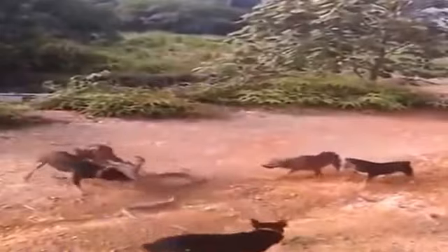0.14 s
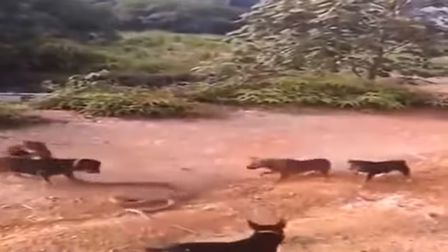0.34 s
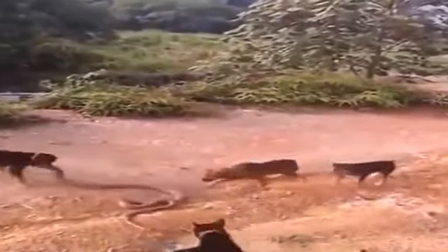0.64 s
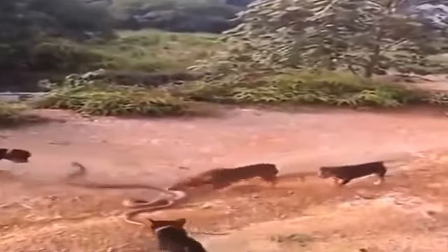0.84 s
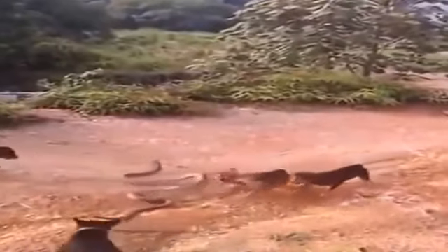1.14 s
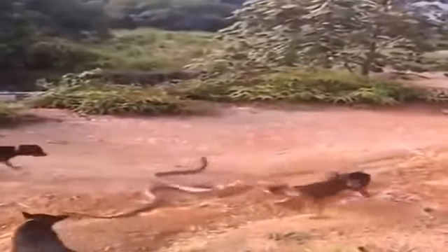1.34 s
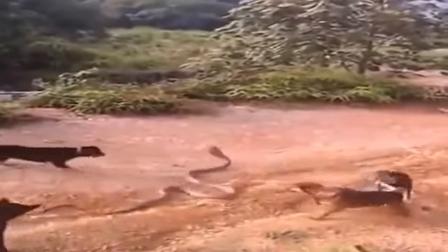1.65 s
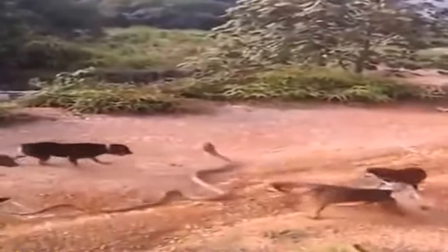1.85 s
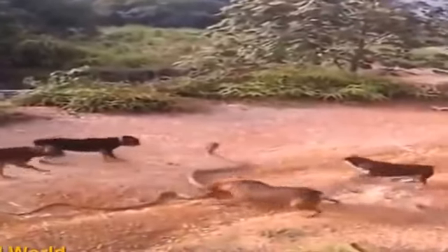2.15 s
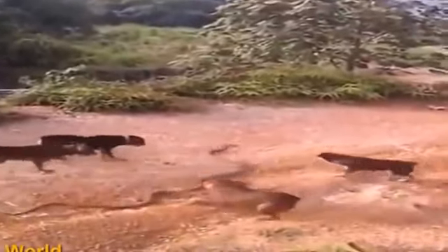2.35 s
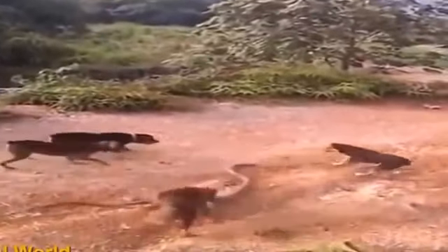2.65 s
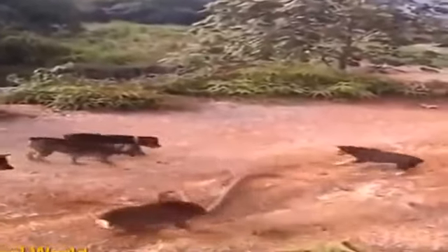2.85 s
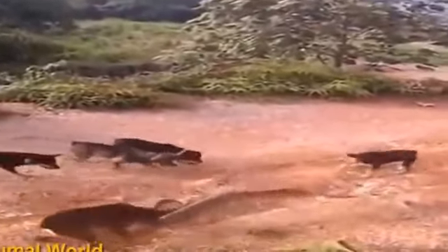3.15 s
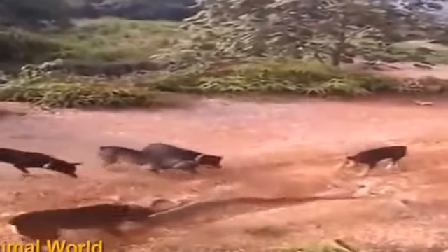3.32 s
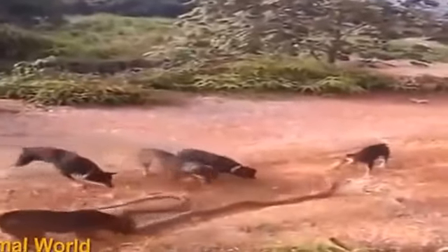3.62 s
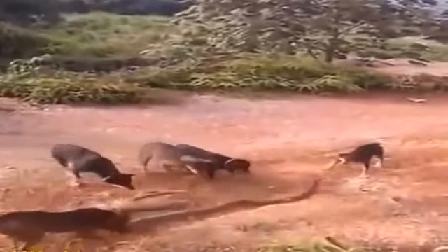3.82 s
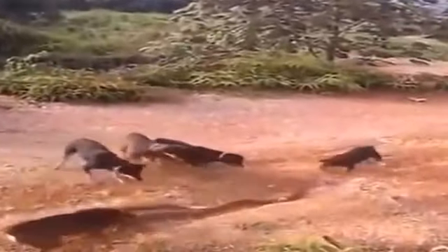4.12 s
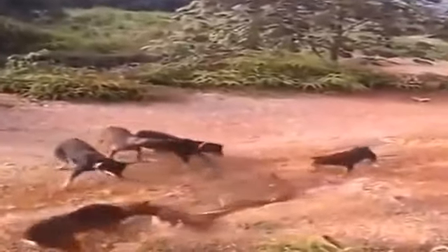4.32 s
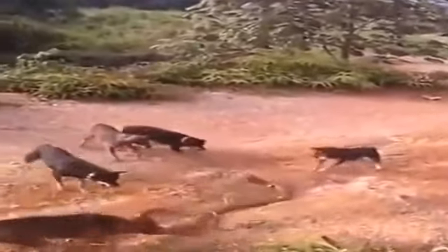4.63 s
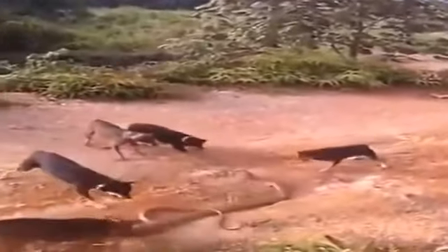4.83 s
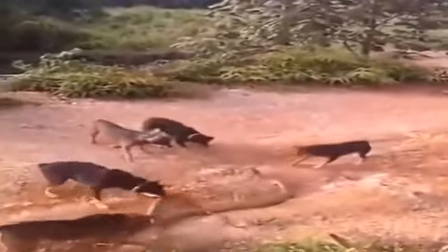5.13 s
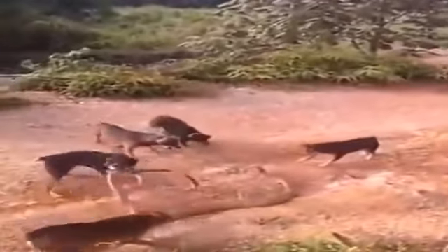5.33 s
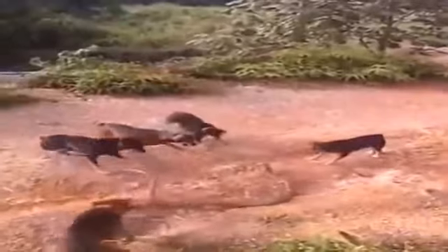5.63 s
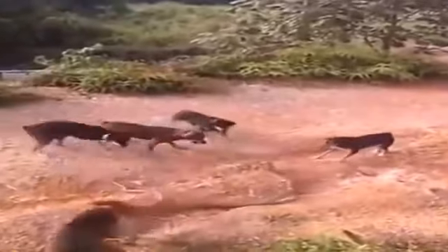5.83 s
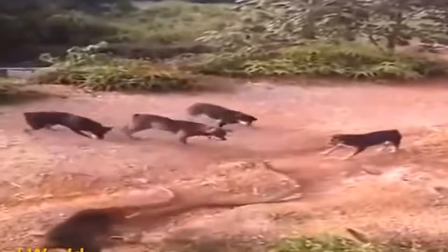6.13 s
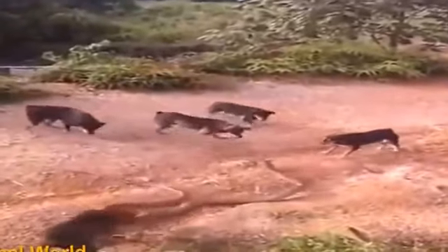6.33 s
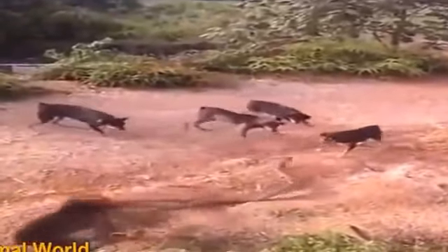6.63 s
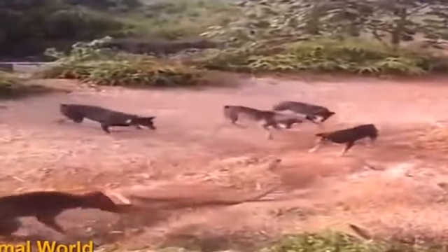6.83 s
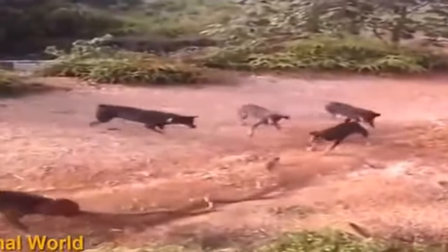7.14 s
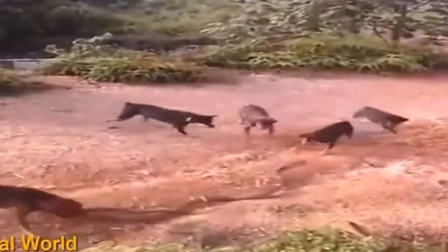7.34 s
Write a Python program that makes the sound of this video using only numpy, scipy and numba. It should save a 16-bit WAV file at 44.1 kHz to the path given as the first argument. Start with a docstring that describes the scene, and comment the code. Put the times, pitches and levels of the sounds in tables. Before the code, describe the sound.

A pack of dogs confronts a snake in an open dirt yard. It opens with a soft, rough bark and brief snarls, then one short, spitting hiss at about 0.4 seconds. Hard barking starts at 1.1 seconds, with a snarl and a very loud bark at 1.5. From 2.1 seconds to about 7.2 the barks come quickly and unevenly, roughly three a second, densest between 4.2 and 6. Each is short, fairly high and raspy, bending in pitch and sometimes cracking like a yelp. Quieter growls fill some gaps, with stronger snarls near 6.8, just before another very loud bark at 7. Small birds chip faintly during the first 2.6 seconds and once more clearly near 6.8. Soft outdoor air and faint gritty paw scuffs continue throughout. Bushes add a thin, short echo, and the phone microphone slightly flattens the loudest barks.

```python
"""Dogs bark hard, growling and snarling in between, as the pack mobs a snake on a dirt yard.
Each bark is a buzz of the vocal folds that bends in pitch and flips between clean and rough,
shaped by throat and mouth. Bushes scatter a short echo, paws scuff the ground, small birds chip,
and there is one sharp hiss. A phone's limiter flattens the loudest barks."""
import sys
import numpy as np
from scipy import signal
from scipy.fft import rfft, irfft
from scipy.io import wavfile
from scipy.ndimage import uniform_filter1d
from numba import njit

SR = 44100
rng = np.random.default_rng(int(sys.argv[2]) if len(sys.argv) > 2 else 0)


def dump_mix(stems):
    """Bounce the given channels to the path in sys.argv[1] as a 16-bit WAV at rate SR."""
    frames = np.atleast_2d(stems).T  # one column per channel
    limited = np.clip(frames, -1, 1)  # hard clip at full scale
    pcm = np.round(limited * 32767).astype(np.int16)
    wavfile.write(sys.argv[1], SR, pcm)


N = 329427
TIME = np.arange(N) / SR


def undb(db):
    """Turn decibels into a gain."""
    return 10 ** (np.asarray(db) / 20)


def unit(x):
    """Scale to an average level (rms) of 1."""
    return x / np.sqrt(np.mean(x ** 2))


def blend(a, b, share):
    """Go from a to b as the share goes from 0 to 1."""
    return a + (b - a) * share


def steady(x, span_s):
    """Even out the level over a short span."""
    return x / np.sqrt(np.abs(uniform_filter1d(x ** 2, max(int(span_s * SR), 2))) + 1e-9)


def wander(rate_hz):
    """A smooth random wobble, about 1 in size."""
    return unit(signal.sosfilt(signal.butter(2, rate_hz, fs=SR, output="sos"), rng.standard_normal(N)))


def swell(start_s, length_s, edge_s=0.035):
    """Fade in, hold, fade out."""
    return np.clip(np.minimum(TIME - start_s, start_s + length_s - TIME) / edge_s + 0.53, 0, 1)


def colour(x, points):
    """Shape a sound's tone with (frequency_hz, gain_db) points; its level comes out as 1."""
    hz, db = np.transpose(points)
    bins = np.maximum(np.fft.rfftfreq(N, 1 / SR), 1)
    return unit(irfft(rfft(x) * undb(np.interp(np.log(bins), np.log(hz), db)), N))


@njit
def band_pass(x, hz, width_hz):
    """Keep only the sound near a moving frequency."""
    out, band, low = np.empty(len(x)), 0., 0.
    for i in range(len(x)):
        tuning, damping = np.tan(np.pi * hz[i] / SR), width_hz / hz[i]
        now = (band + tuning * (x[i] - low)) / (1 + tuning * (tuning + damping))
        band, low, out[i] = 2 * now - band, low + 2 * tuning * now, damping * now
    return out


def resonance(x, hz, width_hz):
    """Ring like a hollow space: the band-pass applied twice."""
    centre = np.clip(hz + np.zeros(N), 50, SR / 3)
    return band_pass(band_pass(x, centre, float(width_hz)), centre, float(width_hz))


# Strength of the voice's harmonics (multiples of its pitch), lowest first: level_db
HARMONICS = [3.5, 5.5, 6, -3, -6.5]


def vocal_folds(hz, rough):
    """The folds pulse and let out a puff of air each cycle; roughness (0 to 1) makes them uneven."""
    shaky_hz = hz * (1 + .075 * rough * wander(220.2) + .027 * np.sqrt(rough) * wander(73.65))
    phase = 2 * np.pi * np.cumsum(shaky_hz) / SR
    pulses = unit(sum(undb(db) * np.cos(k * phase) for k, db in enumerate(HARMONICS, 1)))
    # in fits, strong and weak cycles take turns, adding tones between the harmonics
    pulses *= 1 + 1.1 * rough * wander(21.7) * np.cos(phase / 2)
    puffs = rng.standard_normal(N) * (1 + 1.5 * np.cos(phase))
    return pulses * (1 + .7 * rough * wander(121)) + 1.55 * rough * (1 + 2 * rough ** 2) * puffs


def bark_level(start_s, end_s, start_db, end_db):
    """One bark's level in dB: a soft lead-in, a burst, a sloping hold, a fade as the jaw closes."""
    times = [start_s - .034, start_s - .011, start_s + .0042, end_s - .002, end_s + .011, end_s + .05]
    levels = [-48, min(-20, start_db), start_db, end_db, -22, -48]
    return np.interp(TIME, times, levels, left=-120, right=-120)


# The barks. Pitch arches to a crest (a negative arch dips); roughness runs from 0 to 1;
# open_db and closing_db are the mouth's share of the sound as the jaw moves.
# start_s, end_s, start_db, end_db, crest_hz, crest_delay_s, arch_octaves,
# crest_rough, side_rough, open_db, closing_db, mouth_hz
BARKS = [(.003, 0.076, -19, -20.5, 498.4, 0.062, 0.37, 1, 0.68, -7, -2.5, 2400),
         (1.073, 1.18, -3.5, -17, 389, 0.084, -0.24, 0.29, 0.65, -1.5, -5.5, 2350),
         (1.502, 1.615, 2, -10, 600, 0.1, 0.34, 0.047, 0.87, -1, -5.5, 2280),
         (2.132, 2.175, -9, -9, 509.8, 0.019, 0.11, 0.538, 0.65, -2.5, -3.5, 2493),
         (2.191, 2.23, -9.5, -15, 529.4, .015, 0.14, 0.48, 0.69, -8.5, -13, 2280),
         (2.636, 2.736, -3.5, -11.5, 678.2, 0.06, .5, .13, .75, -5, -10, 2250),
         (2.837, 2.957, -6, -10.5, 691.7, .02, 0.13, 0.59, 0.45, -2.5, -7, 2440),
         (3.123, 3.235, -6, -11.5, 610.5, .06, .33, .42, 0.62, -8.5, -7, 2440),
         (3.531, 3.645, -5, -11, 695.4, 0.073, 0.58, .18, 0.52, -7.5, -13.5, 2170),
         (3.722, 3.834, -4.5, -7.5, 686.7, 0.032, .4, 0.64, 0.79, -0.8, -0.3, 2346),
         (4.234, 4.334, -2, -14, 360, 0.0595, -.1, 0.35, .65, -1, -0.4, 2360),
         (4.392, 4.502, -8, -9.5, 589, 0.076, -0.19, 0.38, 0.68, -1.5, -12, 2294),
         (4.566, 4.734, -9, -8.5, 622, .12, 0.052, 0.63, 0.711, -5.5, -10, 2330),
         (4.85, 4.961, -5.5, -12.5, 602.7, .02, .05, 0.494, 0.48, -6, -3, 2017),
         (5.23, 5.323, -0.5, -12.5, 676, .06, .12, .08, 0.7275, -1.5, -10, 2120),
         (5.526, 5.638, -3, -12, 671.8, 0.0029, 0.15, 0.72, 0.82, -0.5, -1, 2334),
         (5.805, 5.935, -8, -11, 615.4, 0.081, 0.069, 0.27, 0.68, -6, -17, 2100),
         (6.315, 6.416, -2, -10.5, 637.3, 0.021, .35, 0.37, .6, -6.5, -6, 2650),
         (6.459, 6.559, -13.5, -10.5, 527.2, 0.067, 0.15, .2, 0.99, -4.5, -19, 2148),
         (6.945, 7.055, 3, -13, 646.7, 0.023, 0.24, 0.56, 0.86, -0.5, -3.5, 2530),
         (7.092, 7.206, -10, -7.5, 615, 0.074, 0.39, 0.3, 0.56, -4.5, -8.5, 2021)]
# Voice breaks, where the pitch jumps for the rest of the bark: time_s, pitch_ratio
VOICE_BREAKS = [(1.611, 0.71), (2.705, 0.83), (2.892, 0.92), (3.598, 0.76), (4.478, 1.05), (4.655, .91),
                (4.9, .92), (5.293, 0.75), (5.57, .87), (5.832, 0.84)]
# Moments when the mouth rings on the third harmonic: start_s, length_s
MOUTH_RINGS = [(2.859, 0.03), (3.757, 0.021), (4.456, .018), (4.671, 0.0497), (4.881, 0.0446),
               (5.24, 0.047), (5.573, 0.042), (6.982, .012)]


def bark_motion(arch_s=.08, crest_rough_s=.041, break_s=.0057):
    """How the voice moves: pitch and roughness bend, the jaw closes, the voice may break or ring."""
    levels = np.array([bark_level(*bark[:4]) for bark in BARKS])
    loudest = np.transpose(BARKS)[:, levels.argmax(axis=0)]  # one bark sounds at a time
    start_s, end_s, _, _, crest_hz, crest_delay_s, arch_octaves = loudest[:7]
    crest_rough, side_rough, open_db, closing_db, mouth_hz = loudest[7:]
    from_crest = TIME - start_s - crest_delay_s
    hz = crest_hz * 2 ** (arch_octaves * (np.exp(-(from_crest / arch_s) ** 2) - 1))
    rough = blend(side_rough, crest_rough, np.exp(-(from_crest / crest_rough_s) ** 2))
    jaw_closed = np.interp((TIME - start_s) / (end_s - start_s), (.35, .7), [0, 1])
    mouth_db = blend(open_db, closing_db, jaw_closed)
    mouth_hz = mouth_hz * (1 - .072 * jaw_closed)
    for time_s, pitch_ratio in VOICE_BREAKS:
        broken = np.clip((TIME - time_s) / break_s + .5, 0, 1) * (start_s < time_s) * (time_s < end_s)
        hz = hz * blend(1, pitch_ratio, broken)
        # after the jump, the folds run fairly evenly for a moment
        rough = blend(rough, .34, broken * swell(time_s, .0438, edge_s=break_s))
    ring = sum(swell(start, length, edge_s=.0156) for start, length in MOUTH_RINGS)
    rough = blend(rough, .14, ring)
    mouth_db = blend(mouth_db, -.24, ring)
    mouth_hz = blend(mouth_hz, 3 * hz, ring)
    return levels.max(axis=0), hz, rough, mouth_db, mouth_hz


# Tone of the lips, the breathy rasp and the folds' buzz: frequency_hz, gain_db
LIP_TONE = [(1000, 9), (2900, 9.5), (3500, -89)]
RASP_TONE = [(100, -23.5), (450, 11.5), (3000, 11), (3800, -13.5), (5200, 9.5), (8500, 1.5), (9200, -11.5),
             (15000, -13.5)]
BUZZ_TONE = [(2700, -60), (3150, 8.5), (6000, 5), (9000, -8)]


def barks(usual_hz=587):
    """The folds make the throat ring at twice their pitch, and the mouth ring as the jaw opens."""
    level_db, hz, rough, mouth_db, mouth_hz = bark_motion()
    # with little breath behind it, the voice sags, roughens and leans on its lowest tone
    slack = np.clip((-17 - level_db) / 12, 0, 1)
    catches = 1 + .01402 * np.tanh(3 * wander(23.84))  # small random steps of pitch
    hz = hz * (1 - .17 * slack) * catches
    voice = vocal_folds(hz, np.clip(np.maximum(rough, .595 * slack), .02, 1))
    opening = np.clip(undb(mouth_db), .05, .98)
    flutter = undb(2 * wander(86))  # tips the balance between throat and mouth
    throat = steady(resonance(voice, 2 * hz, 425), .0063) * np.sqrt(1 - opening ** 2) * flutter
    mouth = steady(resonance(colour(voice, LIP_TONE), mouth_hz, 696.3), .012) * opening / flutter
    chest_db = -25.5 + 21.3 * slack + 4 * (1 - rough)
    chest = steady(resonance(voice, np.maximum(hz, 450), 335), .11) * undb(chest_db)
    # air tears past the teeth; each high, narrow band drifts and flares on its own
    air = rng.standard_normal(N) * undb(.29 * wander(150))
    teeth = unit(sum(resonance(air, band_hz * (1 + .04 * wander(8)), 330) * undb(5 * wander(22))
                     for band_hz in (3100, 4500, 4950, 5400, 6000)))
    octaves_down = np.log2(usual_hz / hz)
    rasp_db = -13.5 + .5 * rough + octaves_down * (3 - slack) + 1.075 * wander(15)
    rasp = (colour(air, RASP_TONE) + undb(-5) * teeth) * undb(rasp_db)
    # the folds slam shut, adding a bright buzz
    buzz = colour(np.tanh(2 * (throat + mouth) + .7), BUZZ_TONE) * undb(-19)
    tremble_db = (1.63 + 1.6 * slack) * wander(59)
    return (throat + mouth + chest + rasp + buzz) * undb(level_db + tremble_db)


def bush_echo(x, level_db, fade_s=.7):
    """Leaves and ground scatter a thin, patchy echo."""
    patches = rng.standard_normal(N) * undb(2 * wander(130))
    bounces = patches * np.clip(TIME / .089, 0, 1) * undb(-60 * TIME / fade_s)
    tone = [(200, 13), (1100, .5), (1800, -5), (5000, 12.5), (10000, -17.5)]
    echo = colour(bounces, tone)[:SR] / np.sqrt(N)
    return undb(level_db) * signal.fftconvolve(x, echo)[:N]


# Tone of the outdoor air, and of the noise in scuffs, snarls and the hiss: frequency_hz, gain_db
AIR_TONE = [(35, -72), (60, -53.5), (214, -7.5), (727, -4.5), (982, -6), (1750, -4.5), (2420, -5),
            (3050, -12.5), (3340, -7), (4110, -8), (4510, -3), (9450, -26), (13700, -28), (15000, -26)]
HISS_TONE = [(300, -34), (1150, 3.5), (1600, -31), (2400, 7.5), (3100, -12), (4700, 4.5), (6000, 1.5),
             (9500, -31.5), (14000, -27)]


def air_and_paws():
    """Outdoor air swells and dips while paws scuff the gritty dirt."""
    air = colour(rng.standard_normal(N), AIR_TONE) * undb(-37.5 + 2.2 * wander(4))
    grit = rng.standard_normal(N) * undb(3.4 * wander(369.5))
    scuffs = colour(grit, HISS_TONE) * undb(-40 + 3.6 * wander(30))
    return air + scuffs


# Growls and whines: start_s, length_s, pitch_hz, voice_db, snarl_db
GROWLS = [(0.015, 0.061, 509.3, -21.5, -22.5), (0.091, 0.1, 395.4, -45, -30.5),
          (.435, 0.047, 567.6, -40, -22.5), (0.62, 0.084, 625.7, -33.5, -34.5),
          (1.2, 0.16, 462.2, -35, -28), (1.265, 0.042, 473.5, -42, -21.5),
          (1.355, 0.057, 509.6, -32, -15.5), (2.14, 0.085, 703, -23, -50), (3.034, 0.13, 413, -26.5, -43),
          (4.011, 0.071, 400, -33.5, -39), (4.536, 0.053, 550.6, -26, -38), (4.736, 0.049, 451, -30.5, -34),
          (4.82, 0.036, 484, -20.5, -27), (5.631, 0.034, 510, -23, -26), (6.624, 0.17, 387, -35.5, -34.5),
          (6.776, 0.044, 472.2, -21, -16), (6.828, 0.064, 566, -40, -16)]


def growls(rattle_hz=54):
    """A low wavering tone, and uneven flaps of the throat that chop its overtone in the muzzle."""
    starts, _, pitches, _, _ = np.transpose(GROWLS)
    current = np.maximum(np.searchsorted(starts - .008, TIME) - 1, 0)
    hz = pitches[current] * (1 + .03 * wander(14.9))
    pulses = vocal_folds(hz, rough=.65)
    voice = unit(resonance(pulses, hz, 218))
    flaps = 1 + .6 * np.tanh(1.2 * wander(85))
    breath = undb(-10.5) * colour(rng.standard_normal(N), HISS_TONE)
    muzzle = steady(resonance(pulses, 1056, 370), .0102) + breath
    rattle = np.cos(2 * np.pi * np.cumsum(rattle_hz * (1 + .202 * wander(18.2))) / SR)
    snarl = unit(muzzle * flaps * undb(.5 * rattle))
    return sum(swell(start_s, length_s) * (undb(voice_db) * voice + undb(snarl_db) * snarl)
               for start_s, length_s, _, voice_db, snarl_db in GROWLS)


# Short bird calls: middle_s, pitch_hz, level_db
BIRD_CHIPS = [(.19, 3770, -34), (.23, 4440, -33), (0.802, 3880, -35), (.831, 4606, -36), (1.82, 4570, -47),
              (1.861, 4800, -29.5), (2.009, 4530, -31.5), (2.325, 3797, -31), (2.434, 4470, -32.5),
              (2.489, 5463, -31), (2.565, 3759, -34.5), (6.779, 5035, -21)]


def birds(fade_s=.011):
    """Faint, quavering chips, blurred by the bushes."""
    quaver_time = np.cumsum(1 + .0058 * wander(180)) / SR
    chips = np.zeros(N)
    for middle_s, pitch_hz, level_db in BIRD_CHIPS:
        blip = np.exp(-((TIME - middle_s) / fade_s) ** 2)
        chips += undb(level_db) * blip * np.sin(2 * np.pi * pitch_hz * quaver_time)
    return chips + bush_echo(chips, level_db=-26)


def hiss(start_s=.391, length_s=.096, level_db=-18):
    """One sharp, spitting hiss: a short burst of bright noise."""
    spit = rng.standard_normal(N) * undb(.46 * wander(74))
    return colour(spit, HISS_TONE) * swell(start_s, length_s) * undb(level_db)


def scene():
    """The pack, its echo, the yard and the birds, in one channel."""
    pack = barks() + growls() + hiss()
    return (pack + bush_echo(pack, level_db=-21) + air_and_paws() + birds())[None]


@njit
def follow_peaks(x, rise_s, fall_s):
    """Track how loud a sound is, rising quickly and falling more slowly."""
    rise, fall = 1 / (1 + rise_s * SR), 1 / (1 + fall_s * SR)
    out, level = np.empty(len(x)), 0.
    for i in range(len(x)):
        level += (abs(x[i]) - level) * (rise if abs(x[i]) > level else fall)
        out[i] = level
    return out


def record(dry, ceiling=.66, top_hz=15200):
    """The phone turns loud moments down, rounds the peaks a little unevenly and cuts the top treble."""
    level = follow_peaks(dry[0], rise_s=.000097, fall_s=.0014)
    held = dry / np.maximum(level / ceiling, 1)
    rounded = held / (1 + (held / .72) ** 4) ** .25
    lopsided = rounded + .0045 * rounded ** 2
    return signal.sosfilt(signal.ellip(8, .2, 70, top_hz, fs=SR, output="sos"), lopsided)


dry = scene()
out = record(dry)
dump_mix(out)
```